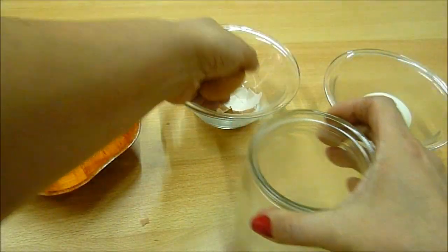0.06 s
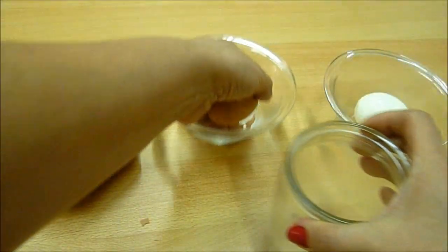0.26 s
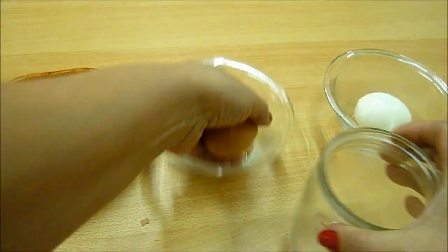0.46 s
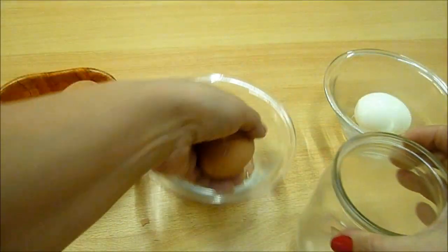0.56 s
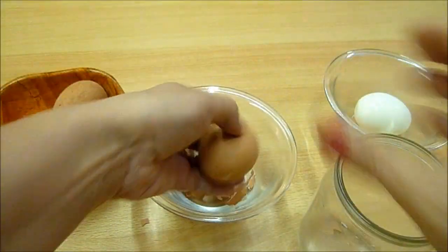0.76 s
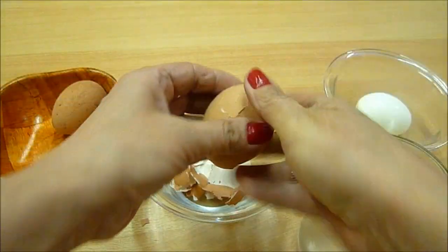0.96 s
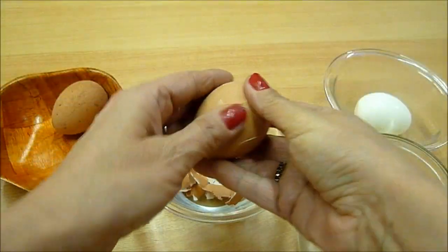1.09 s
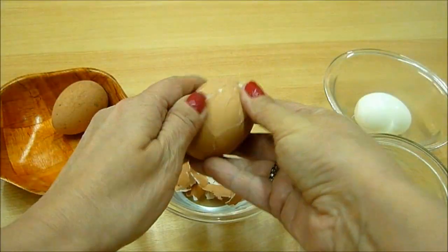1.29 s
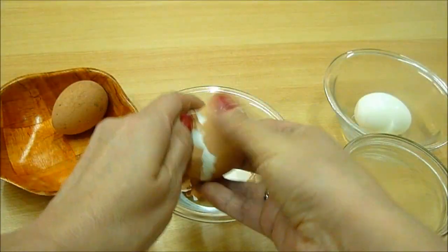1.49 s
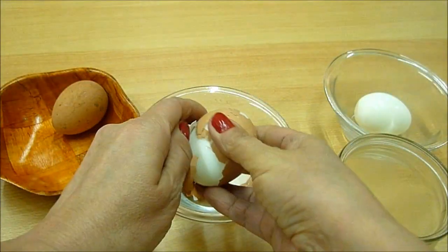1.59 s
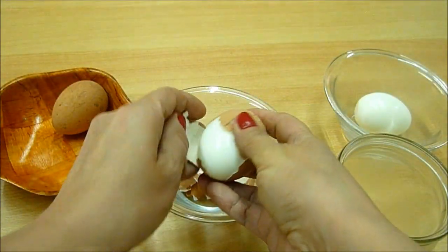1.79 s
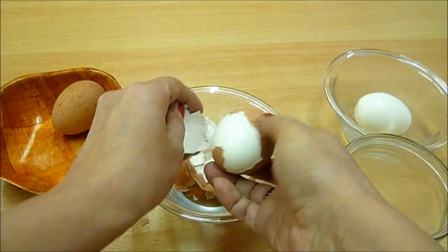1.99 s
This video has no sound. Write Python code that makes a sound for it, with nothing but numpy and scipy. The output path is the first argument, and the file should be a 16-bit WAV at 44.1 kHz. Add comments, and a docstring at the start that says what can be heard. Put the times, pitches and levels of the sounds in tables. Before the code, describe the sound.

In a small room, a glass bowl scrapes over a wooden tabletop, droning low and ringing faintly. After it stops, an eggshell cracks and peels with quiet crackles and small hollow knocks, picked up by a narrow-band camera microphone.

```python
"""A small room with a wooden table. A glass bowl clinks once and is dragged: its foot catches and
slips, the table top drones and the glass sings faintly. Then a boiled egg is cracked and peeled in
faint snaps, hollow knocks and crackles, with one soft bump on the table. Hands rustle over room
noise and a little mains hum, all heard through a narrow-band camera microphone."""
import sys
import numpy as np
from scipy import signal
from scipy.fft import rfft, irfft, next_fast_len
from scipy.io import wavfile
from scipy.ndimage import uniform_filter1d

SR = 44100
rng = np.random.default_rng(int(sys.argv[2]) if len(sys.argv) > 2 else 0)


def waveform_to_disk(signal):
    """Save audio, clipped to [-1, 1], as 16-bit WAV at the path in sys.argv[1]."""
    frames = np.transpose(np.atleast_2d(signal))
    scaled = np.clip(frames, -1, 1) * 32767
    samples = np.round(scaled).astype(np.int16)
    wavfile.write(sys.argv[1], SR, samples)


N = 90404
T = np.arange(N) / SR
FFT_SIZE = next_fast_len(N + SR // 2)
HZ = np.fft.rfftfreq(FFT_SIZE, 1 / SR)
BAND_LIMIT_HZ = 7750


def stick_slip(slips_per_s=190, scatter=.45, spread_db=2, rub_db=-1.5, blur_hz=1330):
    """The bowl's foot slips in uneven pulses that blur into an even rub above blur_hz."""
    gap_draw, size_draw = rng.standard_normal((2000, 2)).T
    at = (np.cumsum(np.exp(scatter * gap_draw)) * SR / slips_per_s).astype(int)
    pulses = np.bincount(at[at < N], amp(spread_db * size_draw[at < N]), N)
    pulse_share = 1 / (1 + amp(2 * rub_db)) / (1 + (HZ / blur_hz) ** 2)
    slips = filtered(unit(pulses - pulses.mean()), np.sqrt(pulse_share))
    rub = filtered(noise(), np.sqrt(1 - pulse_share))
    return slips + rub


# Table top resonances. Each row: frequency in Hz, width in Hz, gain in dB.
TABLE_MODES = [(153.5, 15, -13), (170, 8.3, -16), (263.5, 23, -1.5), (286.6, 9.4, 1), (345.4, 30.4, 3.5),
               (379.2, 18, 4.5), (478, 19, -5), (501.3, 19, -0.5), (547.3, 8.4, 1), (678, 13, -11.5),
               (733, 13.6, -3), (788, 14, -11.5), (945, 25, -14.5), (1250, 21, -13.5)]
# Wood response between resonances. Each row: frequency in Hz, gain in dB.
WOOD_COLOUR = [(30, -43.5), (100, -24), (200, -11.5), (330, -13), (600, -12.5), (1000, -16.5),
               (1300, -20.5), (1500, -27.5), (2200, -31), (3000, -37), (4500, -43.5), (7500, -52.5)]
# Drag force. Each row: time in seconds, level in dB.
DRAG_DB = [(.115, -59), (.145, -41.5), (.205, -40.5), (.238, -27.5), (.29, -26.5), (.32, -21.5),
           (.385, -24), (.46, -20.5), (.55, -22.5), (.575, -17), (.615, -22), (.66, -25), (.71, -30),
           (.75, -39), (.805, -43.5), (.85, -62)]
# Treble of the scrape. Each row: time in seconds, boost relative to the drone in dB.
GRIT_BOOST_DB = [(.15, -8), (.22, -3), (.28, 1.5), (.33, 1), (.39, 3), (.46, 1), (.53, 4.5), (.58, 0),
                 (.62, 4), (.68, 0.5), (.76, 4.5), (.85, 5)]

def scrape(crossover_hz=640):
    """The slips shake the table top: a low drone with grit above it."""
    response = np.hypot(resonances(TABLE_MODES), amp(along(WOOD_COLOUR, HZ)))
    shaken = filtered(stick_slip(), causal(response))
    treble = filtered(shaken, 1 / (1 + (crossover_hz / (HZ + 1)) ** 10))
    drone = shaken - treble
    grit = level(GRIT_BOOST_DB) * steady(treble) * np.std(treble) / np.std(drone)
    return level(DRAG_DB) * (steady(drone, samples=1500) + grit)


# Bowl modes. Each row: frequency in Hz, gain in dB, T60 in seconds.
BOWL_MODES = [(1549, -0.5, 0.13), (2220, -14, 0.066), (3500, -10.5, 0.082), (3567, -5.5, 0.13),
              (5955, -7, 0.24), (5920, -11, .18), (6000, -9, 0.057)]
# Contacts within the clink. Each row: start in seconds, level in dB, hardness in dB per octave.
BOWL_CONTACTS = [(.1183, -44, 2), (0.131, -47, -4.5), (.136, -48, 11), (.153, -50.5, 5.5)]
# Contact tick spectrum. Each row: frequency in Hz, relative level in dB.
TICK_SPECTRUM = [(500, -16), (1500, -18), (3500, 7.5), (4800, -6.5), (6100, 11.5), (6800, -8.5),
                 (7800, -28)]

def clink(tick_db=-32.5, tick_t60_s=.015, pivot_hz=3500):
    """The first contact ticks and each feeds the bowl's modes; the ring flutters as the glass rocks."""
    first_s = BOWL_CONTACTS[0][0]
    out = amp(tick_db) * decay(first_s, tick_t60_s) * coloured(noise(), TICK_SPECTRUM)
    for hz, mode_db, t60 in BOWL_MODES:
        octaves = np.log2(hz / pivot_hz)
        power = sum((amp(db + mode_db + hardness * octaves) * decay(start, t60)) ** 2
                    for start, db, hardness in BOWL_CONTACTS)
        out += np.sqrt(power) * rough_tone(hz, depth=.6, flutter_hz=109.8)
    return out


# Bowl ring under the drag. Each row: time in seconds, level in dB.
SINGING_DB = [(.2, -67), (.3, -50), (.4, -65), (.46, -44), (.62, -45.5), (.72, -48), (.82, -58.5),
              (.97, -72)]

def singing(ring_hz=1557, squeak_hz=6950, squeak_at_s=.59, squeak_half_s=.025, squeak_db=-58):
    """Friction keeps the bowl's lowest mode ringing; the foot squeaks where it presses hardest."""
    ring = steady(filtered(noise(), resonances([(ring_hz, 8.2, 0)])))
    squeak = steady(filtered(noise(), resonances([(squeak_hz, 90, 0)])))
    swell = np.exp(-((T - squeak_at_s) / squeak_half_s) ** 2)
    return level(SINGING_DB) * ring + amp(squeak_db) * swell * squeak


# Shell fractures. Each row: start in seconds, level in dB, band centre in Hz, T60 in seconds.
FRACTURES = [(0.836, -53, 6500, .003), (0.918, -47, 4530, 0.0046), (0.938, -52.5, 4550, 0.0028),
             (1.2843, -45, 6000, .005), (1.3126, -50, 6000, .006), (1.317, -52, 5460, 0.0092),
             (1.3223, -37.5, 5700, 0.0052), (1.329, -45, 5250, 0.0033), (1.333, -40, 5800, .005),
             (1.3365, -39.5, 5440, .008), (1.3433, -37.5, 4870, .005), (1.4455, -45, 4000, .005),
             (1.4521, -47, 4330, 0.0079), (1.4712, -40.5, 3930, 0.0085), (1.4812, -44, 5600, .006),
             (1.4846, -43, 4500, 0.0082), (1.494, -52, 4600, .01), (1.5152, -47, 4100, 0.0076),
             (1.534, -44, 5200, .012), (1.536, -43.5, 6600, 0.016), (1.5885, -51, 6600, .008),
             (1.59, -39.5, 6900, 0.018), (1.622, -44.5, 6230, 0.0056), (1.72, -39.5, 5140, .007),
             (1.7532, -39.5, 6300, 0.0034), (1.757, -34, 6160, 0.005), (1.7611, -40, 3700, 0.009),
             (1.769, -43, 4600, .005), (1.796, -44, 5700, 0.0063), (1.8026, -47, 5900, 0.0074),
             (1.825, -60, 5560, 0.0058), (1.829, -43, 4400, .005), (1.8385, -45, 4300, .006),
             (1.8441, -38, 4150, 0.003), (1.85, -43, 5340, 0.0029), (1.866, -39.5, 5800, 0.0055),
             (1.87, -39.5, 2700, 0.0063), (1.8887, -35.5, 4170, 0.0033), (1.909, -50, 4600, 0.0046),
             (1.9255, -43, 4200, 0.0087), (1.9381, -41.5, 4200, 0.0044), (1.977, -53, 4400, 0.01),
             (1.9802, -47, 5600, .005), (1.9902, -42, 4830, 0.0042), (2.007, -47, 5770, 0.0087)]

def shell_snaps(width_oct=.53, tail_db=-20, tail_t60_s=.064, level_samples=88):
    """Each fracture is a sharp noise burst in its own band with a short crumbling tail."""
    out, length = np.zeros(N), 2048
    hz = np.fft.rfftfreq(length, 1 / SR)
    for start, db, centre_hz, t60 in FRACTURES:
        envelope = decay(0, t60) + amp(tail_db) * decay(0, tail_t60_s)
        burst = rng.standard_normal(length) * envelope[:length]
        band = 1 / (1 + (np.log2((hz + 1) / centre_hz) / width_oct) ** 2)
        band /= 1 + (hz / BAND_LIMIT_HZ) ** 20
        crack = irfft(rfft(burst) * causal(band))
        add(out, start, amp(db) * crack * np.sqrt(level_samples) / np.linalg.norm(crack))
    return out


# Hollow egg knocks. Each row: start in seconds, level in dB, pitch in Hz, T60 in seconds.
EGG_KNOCKS = [(1.3444, -29.5, 1700, 0.0096), (1.72, -40, 1310, 0.0065), (1.7579, -34.5, 1380, 0.0089),
              (1.7618, -31.5, 1770, 0.0085), (1.7692, -38.5, 729.6, 0.02), (1.7689, -32, 1543, 0.006),
              (1.824, -41, 920, 0.021), (1.868, -36, 1328, 0.0063)]

def egg_knocks():
    """As a large piece gives way, the egg rings roughly for a few cycles between the fingers."""
    return sum(amp(db) * decay(start, t60) * rough_tone(hz, depth=.58, flutter_hz=902)
               for start, db, hz, t60 in EGG_KNOCKS)


def tiny_breaks(per_s=2600, spread_db=6):
    """Tiny breaks click at random times with random sizes."""
    breaks = rng.random(N) < per_s / SR
    return breaks * noise() * amp(spread_db * (2 * rng.random(N) - 1))


# Membrane and shell envelopes. Each row: time in seconds, level in dB.
MEMBRANE_DB = [(1.2, -91), (1.27, -56), (1.33, -50.5), (1.38, -61), (1.43, -60), (1.5, -59), (1.59, -48),
               (1.65, -58.5), (1.69, -53.5), (1.78, -55), (1.86, -49.5), (1.93, -53), (2.04, -56)]
CRUMBLE_DB = [(1.28, -66), (1.33, -49.5), (1.37, -62), (1.43, -59.5), (1.47, -53.5), (1.52, -49.5),
              (1.57, -61), (1.7, -61.5), (1.78, -58.5), (1.87, -49), (1.93, -66), (2.04, -55.5)]
# Their spectra. Each row: frequency in Hz, relative level in dB.
MEMBRANE_SPECTRUM = [(500, -26), (2000, -16), (3300, -9.5), (4400, -2), (5200, -3.5), (6100, 9),
                     (7000, -0.5), (8000, -3)]
CRUMBLE_SPECTRUM = [(400, -18.5), (1500, -11), (2200, -8), (3300, -4), (4400, -4), (5200, -7.5),
                    (7500, -12.5)]

def peeling():
    """The membrane tears in a fine crackle; the shell crumbles more coarsely under the thumbs."""
    tearing = level(MEMBRANE_DB) * coloured(tiny_breaks(), MEMBRANE_SPECTRUM)
    crumbling = level(CRUMBLE_DB) * coloured(tiny_breaks(), CRUMBLE_SPECTRUM)
    return tearing + crumbling


# Table shoves and bowl thuds. Each row: start in seconds, level in dB, T60 in seconds.
TABLE_SHOVES = [(1.915, -43, 0.27), (1.957, -43, 0.084)]
BOWL_THUDS = [(0.366, -44.5, .35), (.565, -50.5, 1)]
# Thud spectrum. Each row: frequency in Hz, relative level in dB.
THUD_SPECTRUM = [(20, -16), (45, -9.5), (62, 14), (85, -6.5), (120, -1), (200, -22.5), (600, -59.5)]

def table_bumps(lowpass_hz=450):
    """Soft shoves wake the table's low resonances; the bowl thuds as it is pressed down."""
    shove = sum(amp(db) * decay(start, t60) for start, db, t60 in TABLE_SHOVES)
    thud = sum(amp(db) * decay(start, t60) for start, db, t60 in BOWL_THUDS)
    low_modes = resonances(TABLE_MODES) / (1 + (HZ / lowpass_hz) ** 4)
    wood = steady(filtered(noise(), low_modes), samples=1000)
    rumble = steady(coloured(noise(), THUD_SPECTRUM))
    return uniform_filter1d(shove, size=130) * wood + uniform_filter1d(thud, size=400) * rumble


# Hand rustle envelope. Each row: time in seconds, level in dB.
RUSTLE_DB = [(.8, -55), (.95, -52), (1.04, -49), (1.15, -51), (1.3, -52), (1.45, -56)]
# Rustle spectrum. Each row: frequency in Hz, relative level in dB.
RUSTLE_SPECTRUM = [(60, -6), (200, -5), (450, -1), (1000, -5.5), (2500, -12), (8000, -22)]

def hand_rustle():
    """Skin rubs on the egg as the hands turn it."""
    return level(RUSTLE_DB) * coloured(noise(), RUSTLE_SPECTRUM)


# Mains harmonics. Each row: frequency in Hz, rms level in dB.
MAINS_HARMONICS = [(100, -66), (300, -80.5), (400, -72.5)]
# Room noise spectrum. Each row: frequency in Hz, relative level in dB.
AIR_SPECTRUM = [(20, 2), (45, 1.5), (100, 5), (180, 9.5), (300, 5), (500, -6.5), (800, -9.5), (1600, -19),
                (3000, -22.5), (6300, -13.5), (8000, -25)]

def room_tone(air_db=-58.5):
    """Steady room noise with mains hum."""
    hum = sum(amp(db) * np.sqrt(2) * np.sin(2 * np.pi * (hz * T + rng.random()))
              for hz, db in MAINS_HARMONICS)
    return amp(air_db) * coloured(noise(), AIR_SPECTRUM) + hum


# Room decay. Each row: frequency in Hz, T60 in seconds.
ROOM_T60_S = [(150, .42), (600, 0.97), (2000, 0.81), (8000, 0.18)]

def reverb(x, wet_db):
    """The room adds a diffuse tail that dies fastest in the treble."""
    hz, t, spectra = signal.stft(rng.standard_normal(SR // 2), SR, nperseg=256)
    fade = amp(-60 * t / along(ROOM_T60_S, hz)[:, None])
    _, tail = signal.istft(spectra * fade, SR, nperseg=256)
    return x + amp(wet_db) * signal.fftconvolve(x, tail / np.linalg.norm(tail))[:N]


def amp(db):
    """Decibels to gain."""
    return 10 ** (np.asarray(db) / 20)


def unit(x):
    """x at rms 1."""
    return x / np.sqrt(np.mean(x ** 2) + 1e-20)


def steady(x, samples=2000):
    """x held at rms 1 over a sliding window."""
    return x / np.sqrt(np.abs(uniform_filter1d(x ** 2, samples)) + 1e-12)


def along(points, hz):
    """(Hz, value) points read on a log axis."""
    point_hz, values = np.transpose(points)
    return np.interp(np.log(hz + 1), np.log(point_hz + 1), values)


def level(points):
    """Gain per sample from (s, dB) points."""
    return amp(np.interp(T, *np.transpose(points)))


def decay(start_s, t60_s):
    """Envelope that jumps to 1 at start_s and falls 60 dB per t60_s."""
    return (T >= start_s) * amp(-60 * np.maximum(T - start_s, 0) / t60_s)


def filtered(x, response):
    """x through a frequency response."""
    return irfft(rfft(x, FFT_SIZE) * response, FFT_SIZE)[:N]


def causal(gain):
    """Minimum-phase response with the given magnitude."""
    cepstrum = irfft(np.log(np.maximum(gain, 1e-6)))
    half = len(cepstrum) // 2
    cepstrum[1:half] *= 2
    cepstrum[half + 1:] = 0
    return np.exp(rfft(cepstrum))


def coloured(x, spectrum):
    """x shaped by (Hz, dB) points, at rms 1."""
    return unit(filtered(x, causal(amp(along(spectrum, HZ)))))


def resonances(modes):
    """Magnitude response of (Hz, width in Hz, dB) peaks with steep skirts."""
    return np.sqrt(sum(amp(2 * db) / (1 + ((HZ - hz) / width) ** 2) ** 2 for hz, width, db in modes))


def noise():
    """White noise."""
    return rng.standard_normal(N)


def rough_tone(hz, depth, flutter_hz):
    """A sine whose amplitude and phase waver at random."""
    knots = rng.standard_normal((2, 4096))
    in_phase, quadrature = (np.interp(T * flutter_hz, np.arange(len(k)), k) for k in knots)
    phase = 2 * np.pi * (hz * T + rng.random())
    tone = (1 + depth * in_phase) * np.sin(phase) + depth * quadrature * np.cos(phase)
    return tone / np.hypot(1, depth)


def add(track, start_s, sound):
    """Mix a sound into the track."""
    part = track[round(start_s * SR):][:len(sound)]
    part += sound[:len(part)]


def scene():
    """Bowl, table and egg in the room, in mono."""
    table = reverb(scrape() + singing() + table_bumps(), wet_db=-21.5)
    glass = reverb(clink(), wet_db=-9)
    egg = reverb(shell_snaps() + egg_knocks() + peeling(), wet_db=-12)
    return (table + glass + egg + room_tone() + hand_rustle())[None]


def record(dry):
    """The camera cuts off steeply above its band limit and adds a small DC offset."""
    dc_offset, stop_hz = .017, 8000
    lowpass = 1 / np.sqrt(1 + (HZ / BAND_LIMIT_HZ) ** 50) / (1 + (HZ / stop_hz) ** 110)
    return dc_offset + filtered(dry[0], lowpass)[None]


dry = scene()
out = record(dry)
waveform_to_disk(out)
```